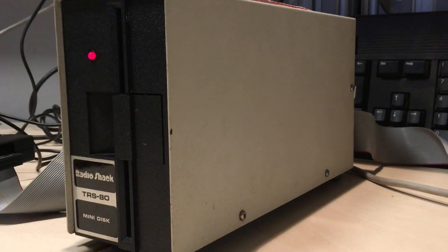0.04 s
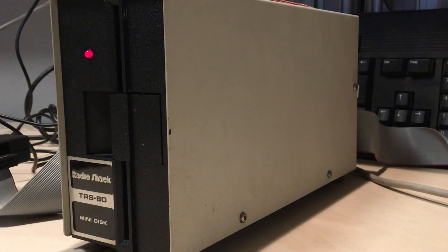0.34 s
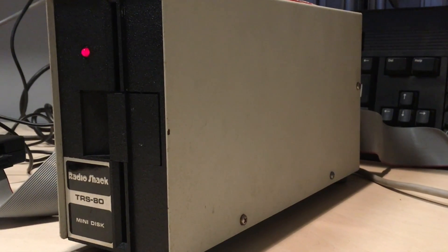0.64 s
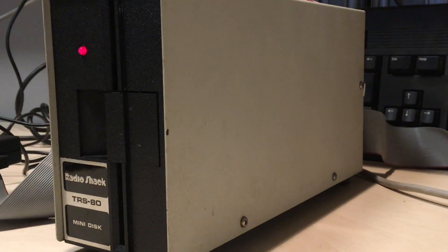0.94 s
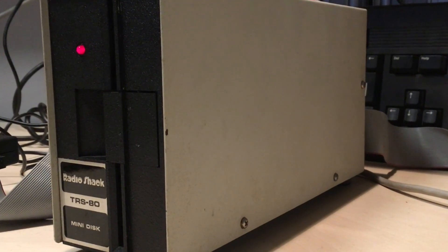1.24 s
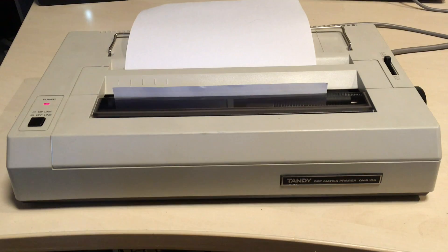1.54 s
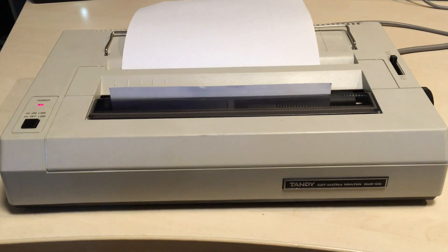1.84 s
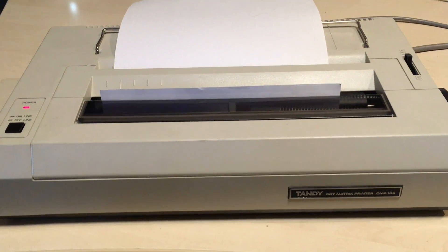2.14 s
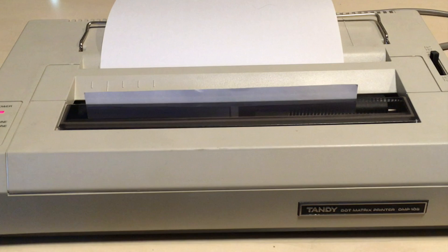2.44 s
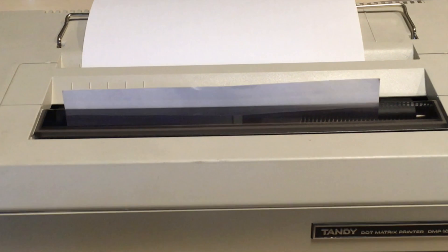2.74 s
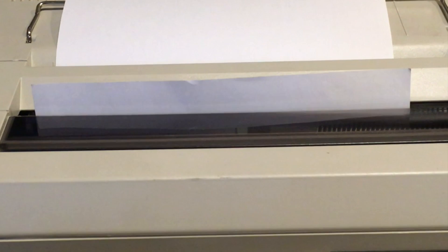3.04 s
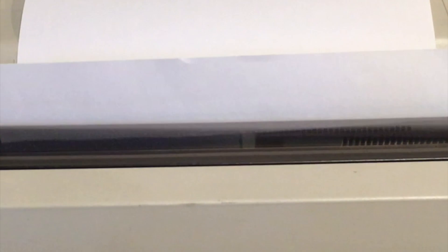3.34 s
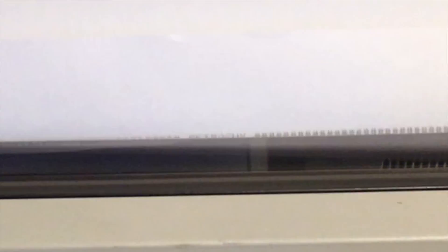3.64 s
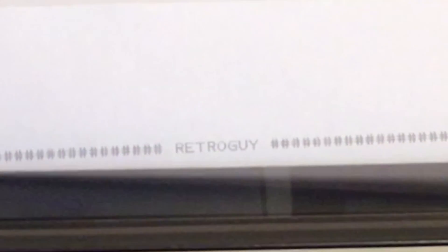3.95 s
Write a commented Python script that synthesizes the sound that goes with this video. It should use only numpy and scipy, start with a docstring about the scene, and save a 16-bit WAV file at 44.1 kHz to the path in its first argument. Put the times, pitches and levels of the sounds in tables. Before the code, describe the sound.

A dot matrix printer is the main sound. First a floppy drive whirs and clatters twice, then the sound cuts to the printer in a small room: a clunk, one harsh buzzing line, and paper feeding in throbbing steps.

```python
"""First a floppy disk drive spins on a desk and steps its head in two clattering runs, and its steel case hums.
At about 1.5 s the sound switches abruptly to a dot matrix printer in a small room. Its carriage starts
with a clunk, and pins hammer out one buzzing line: a repeated sign, a short word, the sign again.
Last, the carriage stops and a motor feeds the paper up line by line.
A picture tube whines thinly throughout."""
import sys
import numpy as np
from scipy import signal
from scipy.fft import rfft, irfft
from scipy.io import wavfile

SR = 44100
rng = np.random.default_rng(int(sys.argv[2]) if len(sys.argv) > 2 else 0)


def digitize_waveform(pressure):
    """Quantize a signal to 16-bit integers and store it at the path in sys.argv[1].

    Rows of a 2-D input are taken as channels; values are limited to [-1, 1].
    """
    field = np.atleast_2d(pressure).T
    bounded = np.clip(field, -1, 1)
    quanta = np.round(bounded * 32767).astype(np.int16)
    wavfile.write(sys.argv[1], SR, quanta)


N = 176400
T = np.arange(N) / SR

CHAR_HZ, COLUMNS = 81.35, 6  # characters a second, columns of dots in each
# The three stretches of print, each with its start and end in seconds.
LEFT_RUN, WORD, RIGHT_RUN = (1.7897, 2.158), (2.173, 2.267), (2.281, 2.654)


def amp(db):
    """Turn decibels into a gain."""
    return 10 ** (np.asarray(db) / 20)


def unit(x):
    """Scale a sound to an average (rms) level of 1."""
    return x / np.sqrt(np.mean(x ** 2) + 1e-20)


def curve(rows, start=0, column=1):
    """A gain that glides between rows of seconds and dB."""
    rows = np.array(rows)
    return amp(np.interp(T - start, rows[:, 0], rows[:, column]))


def wander(rate):
    """A random drift of about 1 either way, with rate new values a second."""
    return np.interp(T * rate, np.arange(4096), rng.standard_normal(4096))


def fade(t, t60):
    """A gain that falls by 60 dB in t60 seconds."""
    return np.exp(-np.log(1000) * t / t60)


def tint(x, colour):
    """Filter by a colour: rows of Hz and relative dB. White noise keeps its power."""
    hz, db = np.array(colour, float).T
    grid = np.maximum(np.arange(4097) * SR / 8192, 1)
    gains = unit(amp(np.interp(np.log(grid), np.log(hz), db)))
    cepstrum = irfft(np.log(gains))
    # Fold the filter so that it rings only after a hit, never before.
    cepstrum[1:4096] *= 2
    cepstrum[4097:] = 0
    return signal.fftconvolve(x, irfft(np.exp(rfft(cepstrum))))[:N]


def treble(x, hz=5500):
    """The part of a sound above hz."""
    return signal.sosfiltfilt(signal.butter(2, hz, "high", fs=SR, output="sos"), x)


def ring(t60):
    """A dense, noisy ringing that dies in t60 seconds."""
    t = T[:SR // 3]
    tail = rng.standard_normal(len(t)) * fade(t, t60)
    return tail / np.linalg.norm(tail)


def blows(rows, hold, t60):
    """Each blow (seconds, dB) chatters for hold seconds, then dies away."""
    power = sum((T >= s) * (amp(db) * fade(np.maximum(T - s - hold, 0), t60)) ** 2 for s, db in rows)
    return np.sqrt(power) * rng.standard_normal(N)


def tone(hz, wander_hz, rate=20):
    """A pure tone whose pitch drifts a little."""
    cycles = rng.random() + np.cumsum(hz + wander_hz * wander(rate)) / SR
    return np.sqrt(2) * np.sin(2 * np.pi * cycles)


def pulses(times, sizes):
    """Sharp clicks that can fall between samples."""
    at = np.clip(times * SR, 8, N - 10)[:, None]
    taps = at.astype(int) + np.arange(-7, 9)
    clicks = sizes[:, None] * np.sinc(taps - at) * np.sinc((taps - at) / 8)
    return np.bincount(taps.ravel(), clicks.ravel(), N)


def gate(start, end):
    """A gain that opens quickly at start and dies away after end."""
    return np.clip((T - start) / .0018, 0, 1) * np.exp(-np.maximum(T - end, 0) / .006)


def room_tone():
    """The faint, low rush of the room."""
    # The room's colour. Each row: frequency in Hz, relative level in dB.
    colour = [(18, -16), (30, -30), (44, -1.5), (122, 7.5), (407, -10), (832, -13), (1350, -10),
              (1460, -13.5), (3400, -19.5), (7690, -27), (13500, -30.5)]
    return amp(-60.5) * tint(rng.standard_normal(N), colour)


def picture_tube(by_drive):
    """A picture tube whines very high, louder beside the drive."""
    # Each row: pitch in Hz, level by the drive in dB, level by the printer in dB.
    whines = [(15391, -54, -67), (15578.5, -51.5, -65), (15596, -55, -70)]
    return sum(tone(hz, wander_hz=.8) * (amp(drive_db) * by_drive + amp(printer_db) * (1 - by_drive))
               for hz, drive_db, printer_db in whines)


def spinning_disk():
    """The disk whirs and rubs in its sleeve; the rubbing makes the head and its arm ring."""
    # The rubbing's colour. Each row: frequency in Hz, relative level in dB.
    rub_colour = [(20, -30), (35, -8), (82, 4.5), (170, -5), (210, -2.5), (330, -9), (470, 1.5),
                  (620, -14.5), (790, -5), (1070, -14.5), (2100, -16.5), (3400, -15.5), (4300, -26.5),
                  (4900, -24.5), (6500, -20.5), (9200, -17), (13500, -19), (14500, -18)]
    # Each row: pitch in Hz, level in dB.
    whir_tones = [(129.2, -70.5), (387.6, -61), (672.9, -65), (1572, -73.5), (2514, -78), (3386, -68),
                  (4204, -85)]
    # Each row: pitch in Hz, time to die away in seconds, level in dB.
    arm_rings = [(2515, 0.089, -66), (3370, .012, -62.5), (4230, 0.02, -61.5), (6500, 0.02, -69),
                 (9330, 0.017, -61.5), (11450, .012, -65)]
    turn_hz = 5.05
    rub_db = -48 - .84 * np.sin(2 * np.pi * turn_hz * T) + .5 * wander(26.7)
    rub = amp(rub_db) * tint(rng.standard_normal(N), rub_colour)
    whir = sum(amp(db + 2.5 * wander(11.36)) * tone(hz, wander_hz=7.05) for hz, db in whir_tones)
    out = rub + whir
    t = T[:SR // 10]
    for hz, t60, db in arm_rings:
        ping = np.sin(2 * np.pi * hz * t) * fade(t, t60)
        out += amp(db) * unit(signal.fftconvolve(rng.standard_normal(N), ping)[:N])
    return out


def case_hum():
    """The drive's steel case hums, swelling with each run of head steps."""
    # Each row: time in seconds, level in dB.
    swell = [(0, -74), (.15, -65), (.21, -42.5), (.3, -44), (.42, -37.5), (.52, -47), (.7, -59.5),
             (.99, -63), (1.05, -43.5), (1.15, -39), (1.23, -40.5), (1.3, -38), (1.4, -47.5), (1.52, -56)]
    # Each row: pitch in Hz, relative level in dB.
    hum_tones = [(132.5, 0.5), (199, -1.5), (268.6, -8.5), (150, -12)]
    return curve(swell) * sum(amp(db) * tone(hz, wander_hz=2.3) for hz, db in hum_tones)


def head_steps():
    """Every step of the drive's head clicks and knocks the case."""
    # Each row: start in seconds, click level in dB, knock level in dB.
    steps = [(0.167, -47, -39), (0.198, -51, -38.5), (0.229, -42.5, -36.5), (0.256, -37, -35),
             (0.286, -47.5, -41), (.318, -56, -43), (.346, -53, -39.5), (0.374, -41, -34.5),
             (.405, -55, -41), (0.432, -64, -42), (1.0037, -33, -33.5), (1.036, -35, -33),
             (1.0664, -36.5, -40), (1.0966, -34.5, -36.5), (1.1256, -36, -32.5), (1.155, -36.5, -36),
             (1.1872, -36, -33.5), (1.2457, -34, -31.5), (1.2742, -28.5, -29)]
    # Each row: frequency in Hz, relative level in dB.
    click_colour = [(300, -18), (1200, 9.5), (2000, 6.5), (2800, -5.5), (4200, 10), (5300, 1), (7500, 5.5),
                    (9500, -6), (12000, 1), (15000, -16)]
    # Where the case rings. Each row: pitch in Hz, width in Hz, relative level in dB.
    case_rings = [(162, 69, -6), (465, 55, 0.5), (796, 69, 2), (1243, 210, -8), (1700, 31, -2),
                  (1920, 150, -16)]
    clicks = tint(blows(np.array(steps)[:, [0, 1]], hold=.0043, t60=.075), click_colour)
    hz = np.geomspace(40, 16000, 300)
    case_power = sum(amp(db) ** 2 / (1 + ((hz - f) / width) ** 2) ** 2 for f, width, db in case_rings)
    case_colour = np.c_[hz, 10 * np.log10(case_power)]
    knocks = tint(blows(np.array(steps)[:, [0, 2]], hold=.0066, t60=.26), case_colour)
    return clicks + knocks


def carriage():
    """The carriage that carries the print head clunks, rumbles along and clunks to a stop."""
    # Each row: start in seconds, level in dB.
    clunks = [(1.7365, -36), (2.714, -40.5)]
    # Two colours. Each row: frequency in Hz, relative level in dB.
    clunk_colour = [(35, -50), (60, -29), (140, -3.5), (310, -10.5), (372, -1.5), (437, -16), (755, -5.5),
                    (808, -14), (1460, -9.5), (3330, -26.5), (4180, -28.5), (14000, -47)]
    rumble_colour = [(50, -31), (100, -28), (135, -3.5), (165, 2), (210, -18), (400, -12.5), (1000, -40)]
    start, stop = clunks[0][0], clunks[1][0]
    travelling = np.clip((T - start) / .0068, 0, 1) * np.clip((stop - T) / .072, 0, 1)
    rumble = amp(-51) * travelling * tint(rng.standard_normal(N), rumble_colour)
    return rumble + tint(blows(clunks, hold=.003, t60=.23), clunk_colour)


def feed_clacks():
    """Gear teeth and the paper guide clack as the paper moves up."""
    # Each row: start in seconds, level in dB.
    clacks = [(2.823, -45), (2.857, -52.5), (2.933, -44.5), (3.1, -58), (3.192, -53), (3.285, -54),
              (3.372, -44), (3.47, -47.5), (3.531, -48.5), (3.556, -44), (3.655, -46.5), (3.68, -47.5),
              (3.739, -44.5), (3.772, -49.5), (3.837, -47), (3.862, -45.5), (3.923, -47)]
    # Each row: frequency in Hz, relative level in dB.
    colour = [(200, -2.5), (700, -2), (1900, 0.5), (3500, 2.5), (4200, -6), (5000, -9), (8000, -15),
              (14000, -29)]
    return tint(blows(clacks, hold=.007, t60=.085), colour)


def paper_feed():
    """A stepper motor turns the roller in short throbbing runs while gears sing and paper rattles."""
    # Each row: start in seconds, motor level in dB, rattle level in dB.
    feeds = [(2.737, -47.5, -46.5), (2.929, -46, -47), (3.099, -44.5, -45.5), (3.283, -45, -44.5),
             (3.468, -45, -44.5), (3.654, -44, -46.5), (3.836, -45.5, -45)]
    # The course of one feed. Each row: seconds from its start, motor change in dB, rattle change in dB.
    shape = [(0, -18, -12), (.014, -3, -3), (.036, -12, -5), (.06, 1, 0), (.1, 1, 1), (.128, -1, -3),
             (.158, -14, -13), (.2, -23, -21)]
    # The motor's ringing and the rattle's colour. Each row: frequency in Hz, relative level in dB.
    motor_rings = [(315, -10.5), (398, -20.5)]
    rattle_colour = [(90, -28.5), (150, 12.5), (230, 4), (290, -17), (400, 1), (480, -1.5), (600, -5),
                     (800, -1.5), (1150, -6), (1450, -4.5), (1900, -6.5), (2500, -10), (3300, -11.5),
                     (4200, -16), (4900, -18), (8000, -22), (14000, -36)]
    motor_hz, gear_hz, ticks_per_s = 151, 37.6, 800
    sing_hz, fall_hz_per_s = 710, 1100
    motor = amp(1.5 * wander(60)) * tone(motor_hz, wander_hz=.06 * motor_hz, rate=52)
    motor += sum(amp(db) * tone(hz, wander_hz=4.8, rate=79) for hz, db in motor_rings)
    ticks = (rng.random(N) < ticks_per_s / SR) * amp(np.clip(rng.standard_normal(N), -2, 2))
    rattle = unit(tint(signal.fftconvolve(ticks, ring(t60=.034))[:N], rattle_colour))
    hiss = treble(rattle)
    out = np.zeros(N)
    for start, motor_db, rattle_db in feeds:
        age = T - start
        running = (age >= 0) * (age < shape[-1][0])
        effort, shake = curve(shape, start), curve(shape, start, column=2)
        throb = 1 + .3 * np.cos(2 * np.pi * gear_hz * (age - .01))
        sing = amp(-9) * np.sqrt(effort) * tone(sing_hz - fall_hz_per_s * age, wander_hz=35.1, rate=120)
        paper = shake * (rattle - hiss) + shake ** 1.5 * hiss  # the treble fades faster than the rest
        out += running * (amp(motor_db) * (effort * throb * motor + sing) + amp(rattle_db) * paper)
    return out


def paper_rasp():
    """The paper rasps under the pins, one puff of noise for each column of dots."""
    # Each row: frequency in Hz, relative level in dB.
    colour = [(200, -26), (450, -0.5), (800, -0.5), (1300, -4), (2100, -0.5), (3000, -0.5), (5000, -3.5),
              (9000, -13.5), (15000, -21)]
    column_phase = (T - LEFT_RUN[0]) * CHAR_HZ * COLUMNS % 1
    puffs = np.exp(-column_phase / .31) * rng.standard_normal(N)
    printing = gate(*LEFT_RUN) + gate(*WORD) + gate(*RIGHT_RUN)
    return amp(-39) * printing * unit(tint(puffs, colour))


def head_buzz():
    """The print head and roller sing at multiples of the character rate."""
    # Each row: multiple, level before the word in dB, level after it in dB.
    overtones = [(2, -54, -50), (6, -47, -53), (7, -55, -50), (8, -58, -51), (10, -54, -61), (12, -50, -44),
                 (18, -44, -40), (19, -48, -60), (21, -41, -48), (22, -48, -45), (23, -42, -45),
                 (24, -33, -41), (25, -55, -45), (26, -48, -51), (28, -47, -48), (29, -46, -57),
                 (30, -42, -37), (36, -44, -46), (39, -47, -52), (42, -40, -44), (46, -48, -49),
                 (48, -45, -48), (51, -48, -50), (54, -45, -55), (55, -46, -61), (66, -44, -52),
                 (78, -63, -47)]
    # Swells of the head's strongest ring and of the rest. Each row: time in seconds, change in dB.
    ring_swell = [(1.79, -5), (1.91, -7), (1.96, 0), (2.15, 1), (2.31, -4), (2.44, -3), (2.53, 4.5),
                  (2.65, 5)]
    buzz_swell = [(1.79, -1.5), (1.91, -4.5), (1.96, 1), (2.15, -0.5), (2.29, 2), (2.45, 0.5), (2.53, 0),
                  (2.65, 0.5)]
    ring_multiples = (23, 24, 25)
    left, word, right = gate(*LEFT_RUN), gate(*WORD), gate(*RIGHT_RUN)
    out = np.zeros(N)
    for multiple, left_db, right_db in overtones:
        in_word = multiple % COLUMNS == 0  # the word keeps only multiples of the column rate
        strength = amp(left_db) * (left + amp(-4) * word * in_word) + amp(right_db) * right
        swell = curve(ring_swell if multiple in ring_multiples else buzz_swell)
        flicker = amp(1.1 * wander(30) + .6 * wander(7))
        out += strength * swell * flicker * tone(multiple * CHAR_HZ, wander_hz=.6)
    return out


def pin_run(start, end, level_db, scatter_db, places=5):
    """Each dot column of a character strikes with its own ring, which changes as the head travels."""
    jitter_s, tick_s = .000018, .00034
    out = np.zeros(N)
    first, last = int(start * SR) - 20, int(end * SR) + 20
    sharp_start = 1 + 3.8 * np.exp(-T[:SR // 20] / tick_s)
    for column in range(COLUMNS):
        times = start + (np.arange(40) + column / COLUMNS) / CHAR_HZ
        force, lateness = rng.standard_normal((len(times), 2)).T
        sizes = amp(scatter_db * np.clip(force, -2, 1)) * (times < end)
        for place in np.linspace(start, end, places):  # each place's ring blends into the next
            nearness = np.sqrt(np.clip(1 - abs(times - place) * (places - 1) / (end - start), 0, 1))
            strike = ring(t60=.027)[:SR // 20] * sharp_start
            hits = pulses(times + jitter_s * lateness, sizes * nearness)
            sound = signal.fftconvolve(hits[first:last], strike)
            out[first:first + len(sound)] += sound
    return out * amp(level_db) / np.std(out[first:last])


def print_pins():
    """Pins hammer the paper: repeated signs buzz steadily, the word is a louder, rougher chatter."""
    # A strike's colour. Each row: frequency in Hz, relative level in dB.
    colour = [(150, -36), (330, -13.5), (560, -6), (800, -2), (1100, -6.5), (1500, -2), (2000, -0.5),
              (2800, -6), (4000, -3.5), (5300, -7), (7000, -5), (8600, -3), (10500, -10), (13000, -10),
              (15500, -18)]
    # Each row: time in seconds, change of the treble in dB.
    brightness = [(1.79, 3), (1.88, 1), (2.03, -1.5), (2.15, 0.5), (2.24, -3), (2.34, 4), (2.45, 1.5),
                  (2.65, -2)]
    left = pin_run(*LEFT_RUN, level_db=-37, scatter_db=2.5)
    word = pin_run(*WORD, level_db=-31, scatter_db=4)
    right = pin_run(*RIGHT_RUN, level_db=-37.5, scatter_db=2.5)
    pins = tint(left + word + right, colour)
    return pins + treble(pins) * (curve(brightness) - 1)


def scene():
    """First beside the drive, then in front of the printer, whose hammering echoes in the room."""
    switch_s = 1.524
    by_drive = np.clip((switch_s - T) / .00074, 0, 1)
    drive = spinning_disk() + case_hum() + head_steps()
    hammering = print_pins()
    echo = amp(-4.5) * signal.fftconvolve(hammering, ring(t60=.26))[:N]
    printer = carriage() + feed_clacks() + paper_feed() + head_buzz() + hammering + paper_rasp() + echo
    return (picture_tube(by_drive) + by_drive * drive + (1 - by_drive) * (room_tone() + printer))[None]


def record(dry):
    """Cut away the treble above 15900 Hz."""
    return signal.sosfilt(signal.ellip(10, .1, 80, 15900, fs=SR, output="sos"), dry)


dry = scene()
out = record(dry)
digitize_waveform(out)
```